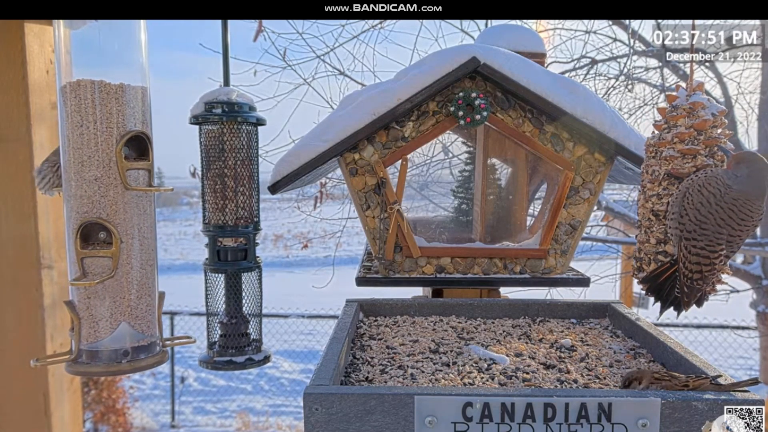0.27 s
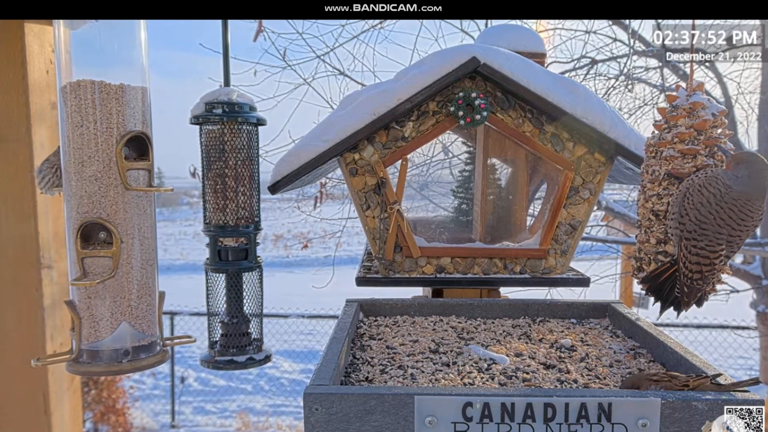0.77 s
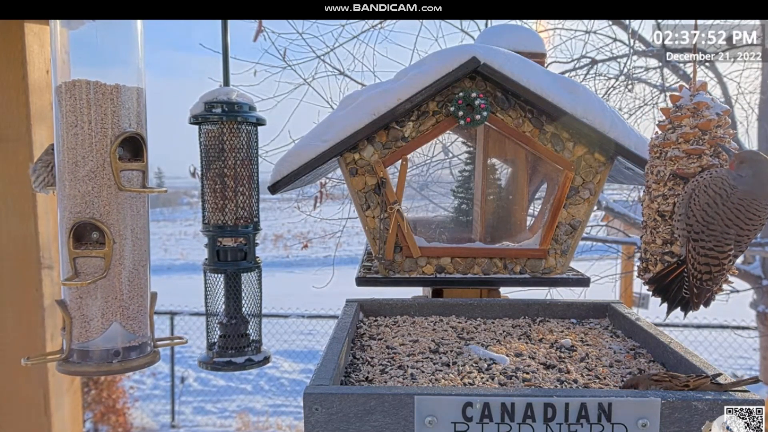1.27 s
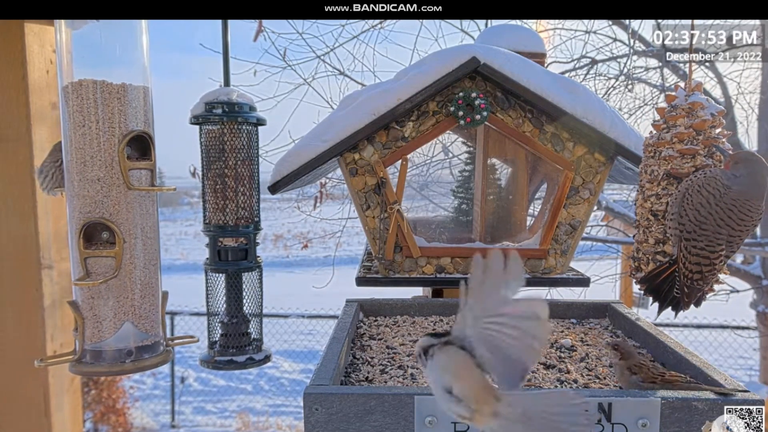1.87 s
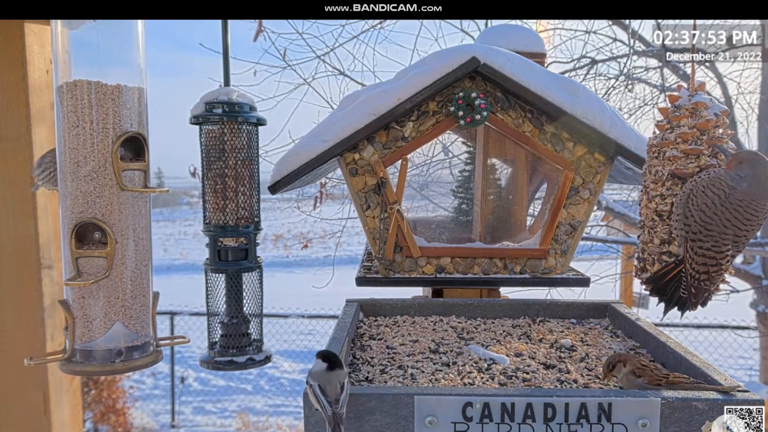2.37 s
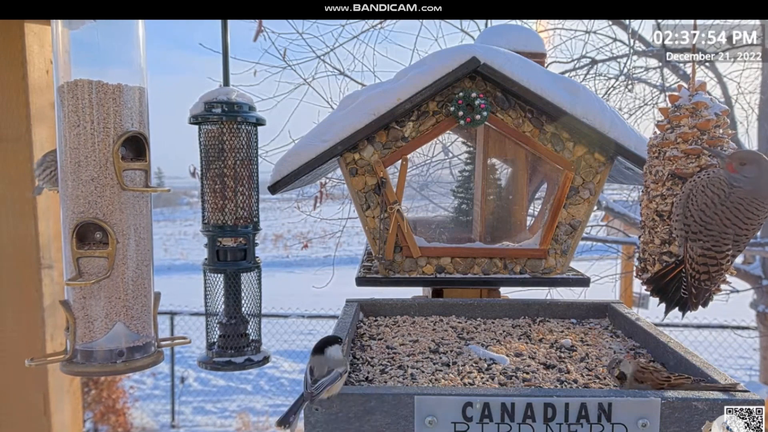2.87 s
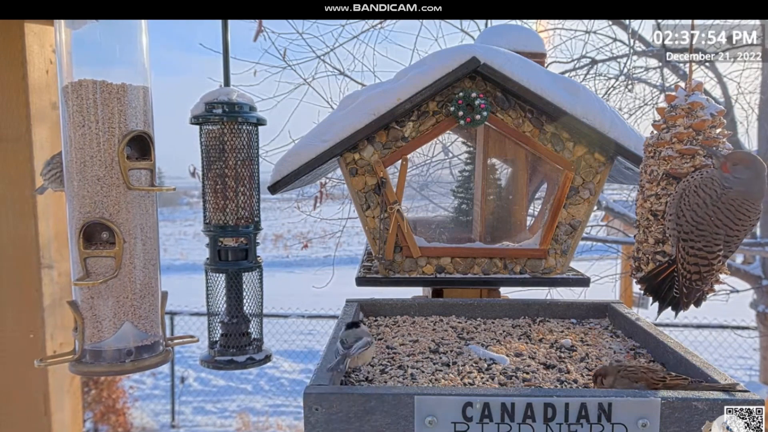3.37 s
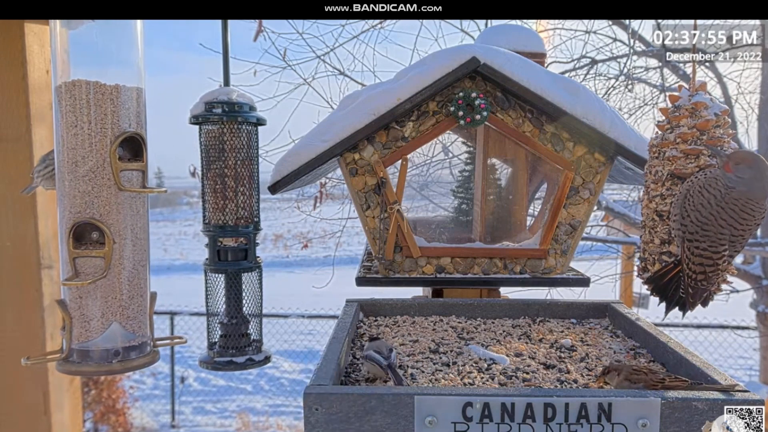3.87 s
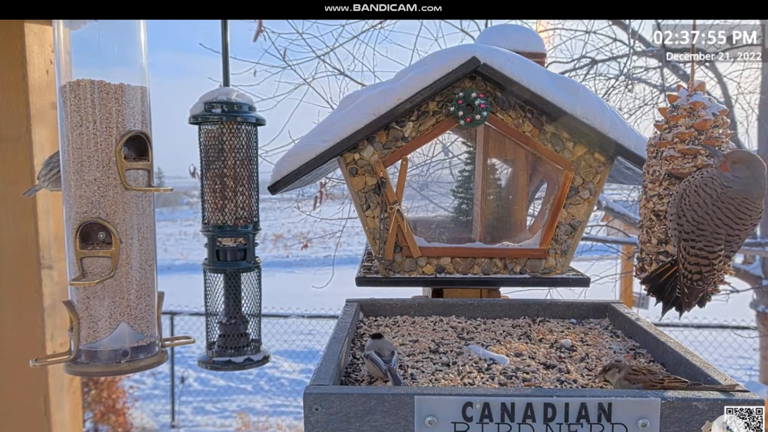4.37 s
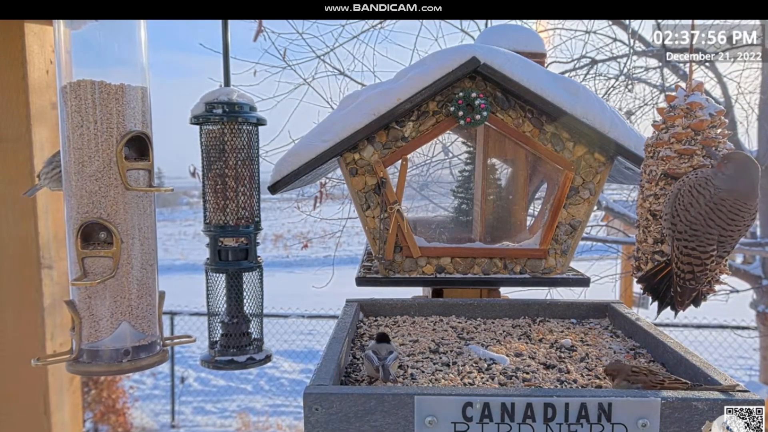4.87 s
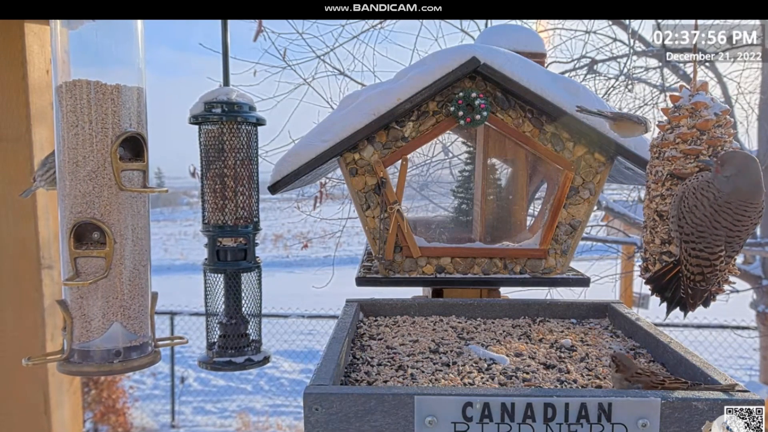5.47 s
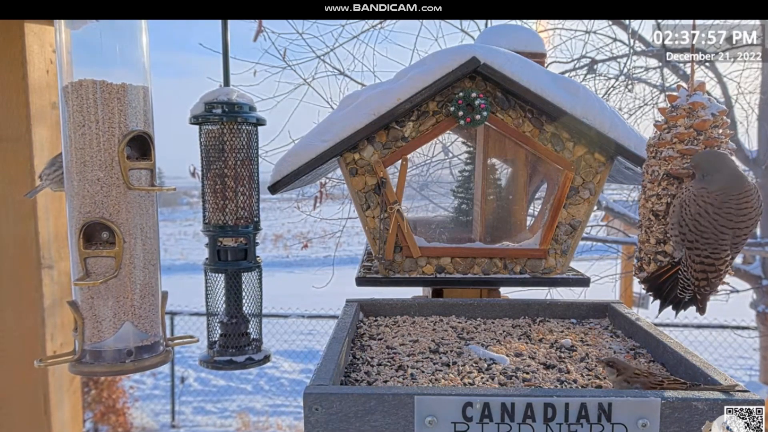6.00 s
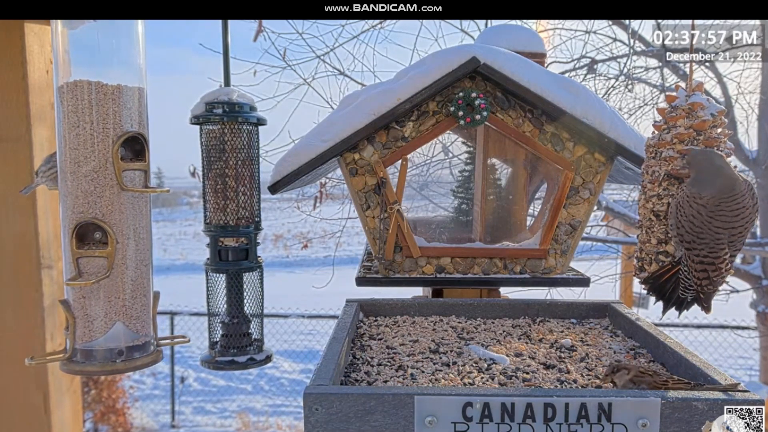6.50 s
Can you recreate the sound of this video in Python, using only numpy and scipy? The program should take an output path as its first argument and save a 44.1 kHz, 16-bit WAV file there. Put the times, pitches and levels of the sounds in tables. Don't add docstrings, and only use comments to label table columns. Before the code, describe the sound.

Small birds flutter close by, one gives a brief high whistle, then beaks tap wood and crack seeds over quiet cold air and hum.

```python
import sys
import numpy as np
from scipy import signal
from scipy.fft import rfft, irfft
from scipy.io import wavfile
from scipy.ndimage import uniform_filter1d

SR = 44100
rng = np.random.default_rng(int(sys.argv[2]) if len(sys.argv) > 2 else 0)


def nominal_scale(level):
    x = np.asarray(level, float) / 20
    return 10 ** x


def master(y):
    cut = np.clip(np.atleast_2d(y).T, -1, 1)
    pcm = np.round(cut * 32767)
    wavfile.write(sys.argv[1], SR, pcm.astype(np.int16))


N = 297234


def evened(x):
    return x / np.sqrt(np.mean(x ** 2) + 1e-20)


def coloured(size, gain):
    hz = np.fft.rfftfreq(size, 1 / SR) + 1
    return evened(irfft(rfft(rng.standard_normal(size)) * gain(hz), size))


def spectrum(points):
    f, db = np.transpose(points)
    return lambda hz: nominal_scale(np.interp(np.log(hz), np.log(f), db))


def hump(centre_hz, octaves):
    return lambda hz: np.exp(-.5 * (np.log2(hz / centre_hz) / octaves) ** 2)


def add(mix, s, sound):
    part = mix[round(s * SR):][:len(sound)]
    part += sound[:len(part)]


def swells(rows):
    t = np.arange(N) / SR
    return sum(db * np.exp(-((t - s) / half) ** 2) for s, half, db in rows)


def struck(hits, modes, vary_db):
    out, t = np.zeros(N), np.arange(8192) / SR
    for s, blow_db in hits:
        varied = rng.standard_normal((len(modes), 2))
        for (hz, db, t60, rise), (shift, lift) in zip(modes, varied):
            ring = nominal_scale(blow_db + db + vary_db * lift - 60 * t / t60)
            ring = ring * (1 - np.exp(-(t / rise) ** 2))
            add(out, s, ring * np.sin(2 * np.pi * hz * (1 + 0.0047 * shift) * t))
    return out


# (frequency [Hz], level [dB per Hz])
STILL_AIR = [(35, -34.5), (60, -2.5), (110, -5.5), (150, -11), (223, -19.5), (484, -16.5), (704, -17),
             (849, -19.5), (1130, -20), (1850, -29.5), (2200, -37), (6850, -48.5), (14800, -52),
             (16300, -60.5)]
# (frequency [Hz], level [dB per Hz])
RUSTLE = [(710, -38.5), (1200, -1), (1800, -1), (3310, -8), (3780, -8.5), (6740, -0.5), (9140, -3),
          (15300, -14.5), (16300, -37.5)]
# (middle [s], half length [s], lift [dB])
BUSY = [
    (.6, .22, 9.5),
    (.92, .1, 7),
    (1.48, .12, 3),
    (3.8, .15, 4.5),
    (4.26, .12, 7),
    (5, .3, 4),
    (5.8, .25, 5),
    (6.74, .4, 5),
]
# (middle [s], half length [s], lift [dB])
PUFFS = [
    (.6, .4, 2),
    (1.39, .1, 4),
    (3.29, .09, 11),
    (3.8, .5, 3),
    (4.41, .08, 6),
    (6.74, .06, 9),
]


def air():
    wash = nominal_scale(-66) * coloured(N, spectrum(STILL_AIR))
    grit = nominal_scale(2.5 * coloured(N, hump(60, 1.5)))
    stir = nominal_scale(-85 + swells(BUSY)) * evened(grit * coloured(N, spectrum(RUSTLE)))
    draught = coloured(N, hump(28.5, 0.51))
    draught /= np.sqrt(uniform_filter1d(draught ** 2, 5000))
    return wash + stir + nominal_scale(-60 + swells(PUFFS)) * draught


# (frequency [Hz], level [dB], waver [Hz])
MACHINES = [(99.8, -66, 0.74), (1114, -83, 2.6), (765, -85.5, 4.), (1251, -84, 6.02), (969, -84, 12),
            (697, -87, 9.)]


def hum():
    out = np.zeros(N)
    for hz, db, waver in MACHINES:
        level = np.sqrt(2) * nominal_scale(db + 0.96 * coloured(N, hump(3, 0.91)))
        pitch = hz + waver * coloured(N, hump(1.5, 1))
        out += level * np.sin(2 * np.pi * np.cumsum(pitch) / SR)
    return out


def glide(points, blur_depth):
    s, hz, db = np.transpose(points)
    t = np.arange(s[0], s[-1], 1 / SR)
    blur = blur_depth * coloured(len(t), hump(300, 1))
    turn = 2 * np.pi * np.cumsum(np.interp(t, s, hz) * (1 + blur)) / SR
    tone = np.sin(turn) + nominal_scale(-34) * np.sin(2 * turn)
    return np.sqrt(2) * nominal_scale(np.interp(t, s, db)) * tone * signal.windows.tukey(len(t), .04)


# (start [s], length [s], first pitch [Hz], last pitch [Hz], level [dB])
FAR_CALLS = [(1.59, .012, 6750, 7300, -82), (1.602, .014, 7300, 6600, -83), (3.285, .025, 6500, 7500, -78),
             (3.31, .04, 7300, 7250, -86), (3.507, .035, 6400, 7900, -71), (3.535, .03, 7400, 7350, -78),
             (3.64, .075, 6800, 6760, -80), (3.745, .055, 3950, 3850, -87), (3.79, .06, 7500, 7700, -86),
             (3.81, .035, 4200, 4500, -87), (6.26, .022, 4600, 5050, -76), (6.284, .03, 4850, 4950, -79),
             (6.318, .022, 4950, 4950, -83), (6.272, .014, 4800, 4400, -82), (6.308, .016, 3900, 3300, -80)]


def far_calls():
    out = np.zeros(N)
    for s, length, hz, end_hz, db in FAR_CALLS:
        bent_hz = hz + .68 * (end_hz - hz)
        points = [(s, hz, db - 4), (s + length / 2, bent_hz, db), (s + length, end_hz, db - 6)]
        add(out, s, glide(points, .024))
    return out


# (time [s], pitch [Hz], level [dB])
CALL = [
    (1.2965, 7340, -44),
    (1.3002, 7450, -37),
    (1.3056, 7630, -23),
    (1.316, 7960, -21.8),
    (1.326, 8115, -27.6),
    (1.3586, 8150, -29),
    (1.362, 6050, -32.5),
    (1.3645, 4600, -41),
    (1.37, 4350, -56),
]


def near_call():
    out = np.zeros(N)
    add(out, CALL[0][0], glide(CALL, 0))
    return out


def in_yard(calls):
    out = calls.copy()
    add(out, .003542, nominal_scale(-21) * out)
    t = np.arange(SR // 2) / SR
    echo = rng.standard_normal(len(t)) * nominal_scale(-60 * t / .36) * (t > .004)
    back = signal.fftconvolve(out, echo / np.linalg.norm(echo))[:N]
    smear = .9 + .5 * coloured(N, hump(200, .8))
    return out + nominal_scale(-36) * back * smear


# (time [s], level [dB])
WIRE_TAPS = [
    (1.648, -74.5),
    (2.527, -58),
    (3.139, -64.5),
    (3.186, -71),
    (6.545, -71.5),
]
# (frequency [Hz], level [dB], t60 [s], build-up [s])
WIRE = [(2500, -15, 0.034, .0003), (4050, -9, 0.04, .0003), (5600, -1, 0.024, 0.00078),
        (7250, -14, .04, .0003), (8000, 0, 0.05, .0003), (11500, -13, .035, .0003),
        (14700, -22, .03, .0003)]


def wire_feeder():
    return struck(WIRE_TAPS, WIRE, 1.8)


# (time [s], rap of the rim [dB], boom of the floor panel [dB])
KNOCKS = [
    (1.878, -58, -68),
    (4.102, -60, -81),
    (4.529, -71, -60.5),
    (4.729, -48, -49.5),
    (5.008, -60, -56.5),
    (5.414, -59, -66),
    (5.587, -57, -52.5),
    (5.68, -84, -70),
    (5.774, -58, -54),
]
# (frequency [Hz], level [dB], t60 [s], build-up [s])
RIM = [(418, 1, 0.024, 0.00036), (688, -5, 0.11, 0.005), (980, 7.5, 0.022, 0.0019),
       (1417, 12, 0.018, 0.002), (1890, -3, 0.018, 0.00043)]
# (frequency [Hz], level [dB], t60 [s], build-up [s])
PANEL = [(122, 1.5, 0.097, 0.00047), (200, 3, 0.086, 0.0035), (244, -1.5, 0.32, 0.0097),
         (272, -4.5, 0.13, 0.012), (165, -7.5, 0.32, 0.0038)]


def tray():
    rap = struck([(s, rap_db) for s, rap_db, _ in KNOCKS], RIM, 1.8)
    boom = struck([(s, boom_db) for s, _, boom_db in KNOCKS], PANEL, 0.7)
    return rap + boom


# (time [s], peak level [dB], frequency [Hz])
BUMPS = [(0.289, -56, 200), (.43, -56, 200), (.546, -58, 250), (.5535, -56, 380), (0.751, -54, 220),
         (.7625, -53, 330), (.893, -60, 200), (.8995, -48, 280), (4.122, -57, 160), (4.129, -55, 200),
         (4.162, -56, 300), (4.1712, -43.5, 380), (4.175, -54, 400), (4.2025, -48, 300), (4.207, -56, 250),
         (4.2125, -48, 330), (5.5915, -52, 240)]


def bumps():
    out = np.zeros(N)
    for s, db, hz in BUMPS:
        turns = np.arange(-2, 2, hz / SR)
        scuff = nominal_scale(-16) * coloured(len(turns), hump(2.2 * hz, .8))
        push = -np.sin(2 * np.pi * turns + .4) + scuff
        add(out, s - 2 / hz, nominal_scale(db) * push * np.exp(-(turns / .65) ** 2))
    return out


# (time [s], feather hiss [dB], length [s], push of air peak [dB])
HOVER = [(.256, -75, .033, -49), (.294, -73, .037, -54), (.399, -73.5, .019, -50), (.43, -71, .017, -58),
         (.471, -67, .014, -73), (.49, -65, .008, -60), (.501, -69.5, .045, -54), (.545, -67, .02, -48),
         (.582, -66.5, .0092, -67), (.612, -70, .03, -56), (.681, -63.5, .037, -40.5),
         (.724, -68, .028, -43), (.758, -67, .016, -43), (.785, -72.5, .024, -60), (.857, -64, .035, -39),
         (.898, -63, .018, -38), (.962, -67, .023, -45), (.989, -68, .011, -61)]
# (time [s], hiss [dB],
# length [s], push of air peak [dB])
FLICKS = [(2.114, -73, .033, -47.5), (2.132, -70, .019, -48.5), (2.156, -73, .023, -62),
          (2.269, -70.5, .02, -60), (3.434, -72, .024, -65), (4.067, -75.5, .038, -62),
          (4.089, -67, .045, -42), (4.129, -64.5, .025, -42.5), (4.154, -67, .017, -71),
          (4.164, -64, .021, -48), (4.194, -67.5, .045, -57), (4.209, -63, .009, -53),
          (4.32, -71.5, .029, -50), (4.381, -73, .012, -51.5), (4.737, -71, .05, -69),
          (5.013, -73, .03, -68), (5.774, -69, .02, -61)]


def quills(hz):
    return spectrum(RUSTLE)(hz) * (2.5 + hump(7500, .45)(hz))


def wings():
    out, t = np.zeros(N), np.arange(4096) / SR
    swing = np.cos(2 * np.pi * 21 * t) * np.exp(-(t / 0.039) ** 4)
    flap = -(1 - np.exp(-t / .002)) * swing
    for s, hiss_db, length, flap_db in HOVER + FLICKS:
        fade = np.exp(-(t / length) ** 3) + .15 * np.exp(-t / .02)
        puff = np.minimum(t / 0.00067, 1) * fade
        hiss = coloured(len(t), quills) * nominal_scale(3.2 * coloured(len(t), hump(150, 1)))
        add(out, s, nominal_scale(hiss_db) * hiss * puff + nominal_scale(flap_db) * flap)
    return out


def hits(rows):
    out, t = np.zeros(N), np.arange(4096) / SR
    wide, tap = spectrum(RUSTLE), hump(2850, 0.43)
    for s, db, hz, octaves, tap_db in rows:
        bump = hump(hz, np.clip(octaves, .08, 1))

        def colour(f):
            skirt = .14 / (1 + (2600 / f) ** 6)
            return (bump(f) + skirt) * np.sqrt(wide(f)) + nominal_scale(tap_db + 9.5) * tap(f)

        crack = coloured(len(t), colour)
        t60 = max(.012 + .00025 * (db + 55), .004)
        shape = nominal_scale(-60 * t / t60) * np.minimum(t / .0009, 1)
        shape = shape * (1 + 1.7 * nominal_scale(-60 * t / .004))
        shape = shape + nominal_scale(-22 - 60 * t / 0.07)
        add(out, s, nominal_scale(db - 7) * evened(crack * shape) * np.sqrt(np.mean(shape ** 2)))
    return out


# (time [s], peak level [dB], centre [Hz])
TICKS = [(.492, -55, 6000), (.505, -58, 8000), (.55, -60, 7500), (.583, -60, 7000), (.729, -60, 8000),
         (.764, -57, 7000), (.765, -57, 2500), (.859, -55, 7500), (.901, -52, 2200), (.974, -61, 3200),
         (.991, -56, 3500), (1.001, -58, 8000), (1.031, -63, 7000), (1.099, -65, 7500), (1.117, -62, 6500),
         (1.398, -62, 5300), (1.853, -65, 5500), (2.28, -56, 6500), (2.347, -63, 5500), (2.486, -60, 10000),
         (3.486, -62, 9000), (4.16, -58, 3300), (4.214, -55, 2600), (4.735, -50, 5000), (4.742, -56, 3800),
         (5.001, -62, 6500), (5.014, -53, 4000), (5.026, -58, 3000), (5.032, -61, 3000),
         (5.5825, -55, 7500), (5.594, -50, 6000), (5.6, -57, 7500), (5.61, -60, 5500), (5.694, -62, 7000),
         (5.763, -61, 7000), (5.771, -52, 6000), (5.781, -49, 6000), (5.786, -52, 4500), (5.799, -59, 6500),
         (5.812, -60, 7000), (5.855, -62, 7000), (6.256, -62, 8000), (6.27, -65, 7000), (6.367, -65, 8000)]
# (time [s], peak level [dB], centre [Hz])
PATTER = [(.549, -60, 2000), (.554, -61, 1400), (.695, -62, 1600), (.722, -62, 1800), (.967, -61, 1600),
          (1.88, -58, 1500), (1.971, -60, 2000), (2.527, -58, 1700), (4.092, -62, 1400), (4.131, -61, 1900),
          (4.145, -63, 1200), (4.163, -59, 1600), (4.168, -59, 1900), (4.175, -58, 1500),
          (4.2135, -56, 1400), (4.219, -61, 2800), (4.731, -48, 1450), (5.01, -53, 1000),
          (5.589, -52, 1300), (5.776, -54, 1400), (5.808, -62, 2500)]


def ticks():
    return hits([(*row, .35, -25) for row in TICKS + PATTER])


# (time [s], peak level [dB], centre [Hz])
NIBBLES = [(1.927, -65, 7500), (1.984, -54.5, 5420), (2.0483, -54.5, 7320), (2.1096, -59, 7710),
           (2.1276, -51, 7990), (2.1486, -55, 7690), (2.228, -63, 6500), (2.2732, -55, 5600),
           (2.4905, -53, 8800), (2.5083, -57, 7170), (2.598, -52.5, 9740), (2.619, -52.5, 6840),
           (2.6724, -65, 9790), (2.9517, -59, 6400), (3.0784, -64.5, 7140), (3.1048, -58, 6820),
           (3.269, -55, 7250), (3.3224, -63, 7200), (3.4384, -53, 7380), (3.46, -57, 6910),
           (3.472, -55, 10000), (3.806, -55.5, 6150), (3.866, -62.5, 6340), (3.9946, -60, 6940)]
# (time [s], peak level [dB], centre [Hz])
RUMMAGE = [(4.13, -61, 6720), (4.1589, -60, 6560), (4.417, -57, 8350), (4.5261, -51, 7200),
           (4.5694, -63.5, 5770), (4.667, -54, 7000), (4.7072, -60, 6520), (4.713, -55, 8560),
           (4.72, -54, 7110), (5.805, -51, 8500), (4.8514, -60, 6170), (4.864, -61, 7710),
           (5.287, -56, 6980), (5.315, -53, 8090), (5.3234, -56, 7600), (5.6845, -60, 6480),
           (5.7523, -55, 6100), (5.8368, -55.5, 7220), (5.9286, -58.5, 8600), (6.1295, -60, 5590),
           (6.1749, -50, 7700), (6.2322, -56, 4600), (6.3445, -61, 6290), (6.3508, -61.5, 7700),
           (6.4572, -62, 7650), (6.523, -55, 7500), (6.586, -59, 5230), (6.6017, -48, 6200),
           (6.627, -52.5, 7300), (6.656, -62, 7720)]


def seed():
    nibbling = hits([(*row, .43, -22) for row in NIBBLES])
    return nibbling + hits([(*row, .43, -18) for row in RUMMAGE])


# (time [s], peak level [dB], centre [Hz])
TAPS = [(1.6472, -63, 3960), (1.8442, -57, 3000), (1.8767, -52, 5000), (1.968, -50, 2700),
        (3.0403, -60, 3740), (3.1855, -59.5, 3980), (3.4903, -56, 4430), (4.0547, -58, 3510),
        (4.3166, -56.5, 3650), (4.349, -59, 4890), (5.23, -56, 2900), (6.1504, -57, 3770),
        (6.2946, -59, 4760)]
# (time [s], peak level [dB], centre [Hz], spread [octaves], dull tap [dB])
CRACKS = [(2.2892, -37, 9040, .37, -57), (2.5263, -40, 7200, .6, -30), (2.7503, -50.5, 7650, .49, -19),
          (2.8953, -51.5, 6950, .54, -23.5), (3.2472, -47.5, 6860, .5, -9), (3.582, -49.5, 6000, .29, -19),
          (4.0999, -42.5, 7000, .44, -42), (4.174, -47, 8400, .17, -21), (4.2148, -47, 9000, .3, -13),
          (4.7301, -33.5, 6600, .5, -11), (4.832, -45, 7900, .4, -37), (5.008, -45, 7000, .3, -20),
          (5.0372, -55, 7000, .51, -24), (5.047, -43, 10500, .54, -30), (5.0788, -50.5, 7440, .4, -17),
          (5.1588, -45, 6700, .28, -30), (5.281, -48, 9360, .4, -18), (5.3345, -45, 8000, .1, -36),
          (5.4126, -42.5, 6900, .26, -8), (5.442, -36.5, 7000, .33, -24.5), (5.5871, -31, 7800, .5, -11),
          (5.6294, -42, 7340, .21, -22), (5.6466, -43, 7500, .19, -39), (5.7735, -37.5, 6600, .6, -12)]


def pecks():
    return hits(CRACKS) + hits([(*row, .3, -14) for row in TAPS])


def scene():
    background = air() + hum() + in_yard(far_calls() + near_call())
    feeder = wire_feeder() + tray() + bumps()
    return (background + feeder + wings() + ticks() + seed() + pecks())[None]


# (time [s], kept band [Hz], kept band [Hz])
STARVED = [(.15, 3000, 7000), (1.055, 6300, 8800), (1.5, 6600, 7400), (1.75, 3000, 5500),
           (2.243, 7300, 8200), (2.383, 3900, 6800), (3.96, 3000, 7500), (4.241, 2500, 7600),
           (4.285, 3700, 5500), (5.475, 3100, 8300), (5.483, 8000, 8600), (5.49, 8300, 8600),
           (5.54, 5600, 7800), (5.703, 3000, 8000), (6.05, 3800, 8200), (6.58, 5300, 7700)]


def starve(x):
    hz, t, z = signal.stft(x, SR, nperseg=512, noverlap=384)
    for s, *kept_hz in STARVED:
        named = sum(abs(hz - f) < .03 * f + 100 for f in kept_hz)
        stray = (rng.random(len(hz)) < .12) * (hz < 10500)
        kept = named + stray > 0
        hole = np.exp(-((t - s) / .0062) ** 4)
        bar = np.exp(-((t - s) / .016) ** 4)
        change_db = np.outer(kept, 6 * bar) - np.outer(~kept, 27 * hole)
        z = z * nominal_scale(change_db * (hz > 2150)[:, None])
    return signal.istft(z, SR, nperseg=512, noverlap=384)[1][:, :N]


def roll_off(x):
    return signal.sosfilt(signal.butter(12, 16460, fs=SR, output="sos"), x)


# (start [s], end [s])
DROPOUT = (1.326225, 1.352551)


def record(dry):
    t = np.arange(N) / SR
    heard = signal.oaconvolve(starve(dry), signal.firwin(511, 15800, fs=SR)[None], "same")
    heard = heard * ((t < DROPOUT[0]) | (t > DROPOUT[1]))
    heard = signal.oaconvolve(heard, signal.firwin(101, 16200, fs=SR)[None], "same")
    swell = nominal_scale(np.array([-8, -1, 5, 9, -20]))
    swell = np.interp(t, [1.339, 1.35, 1.36, 1.368, 1.377], swell, 0, 0)
    noise = coloured(N, lambda hz: hump(6200, .33)(hz) + .06 * hump(12000, .4)(hz))
    return roll_off(heard + nominal_scale(-59) * swell * noise)


dry = scene()
out = record(dry)
master(out)
```